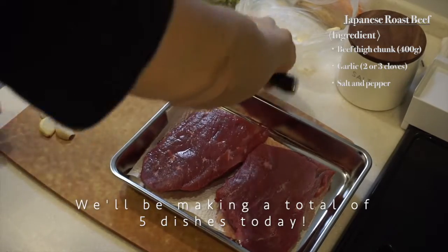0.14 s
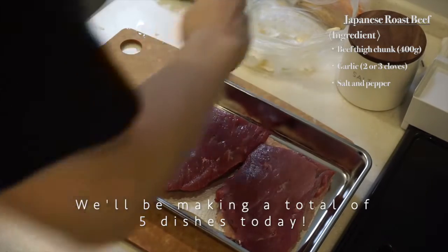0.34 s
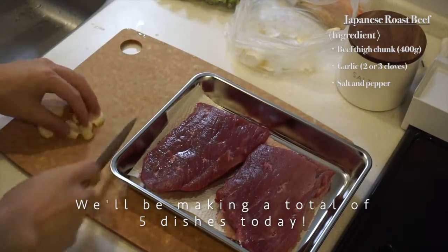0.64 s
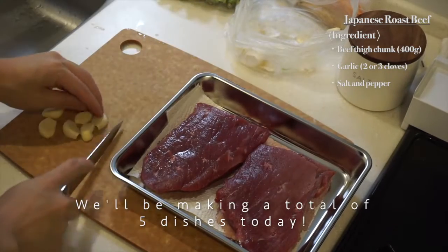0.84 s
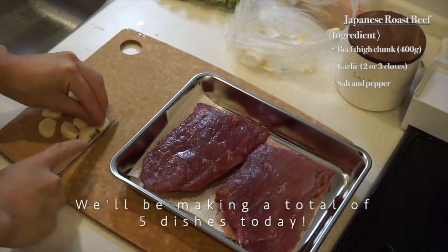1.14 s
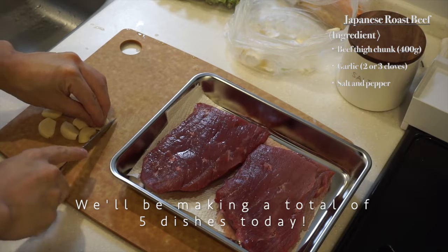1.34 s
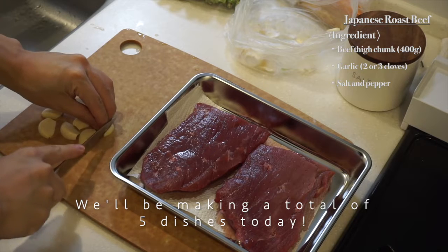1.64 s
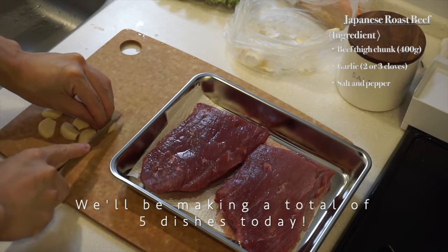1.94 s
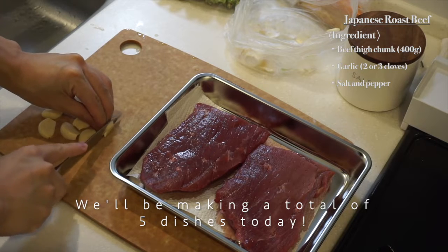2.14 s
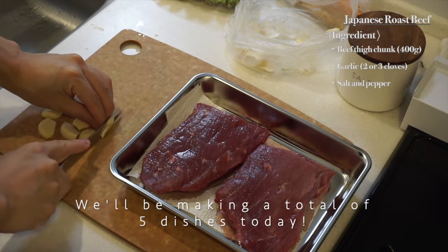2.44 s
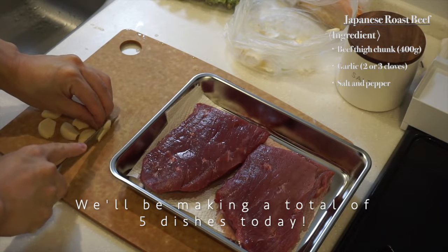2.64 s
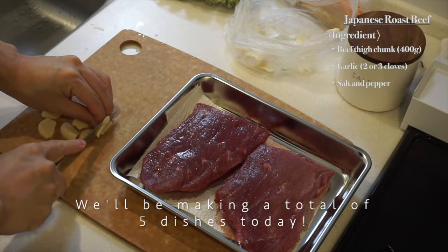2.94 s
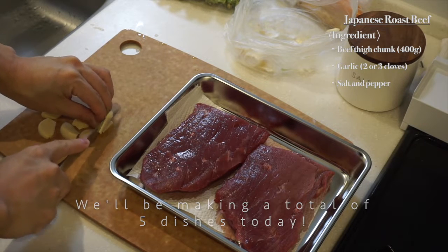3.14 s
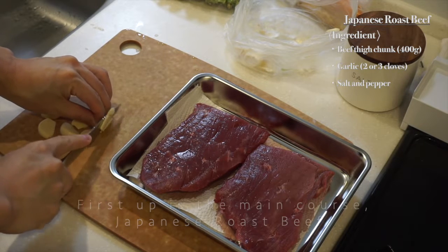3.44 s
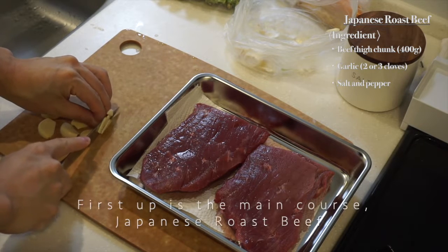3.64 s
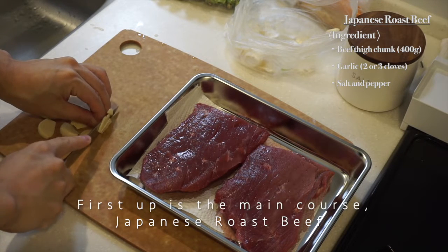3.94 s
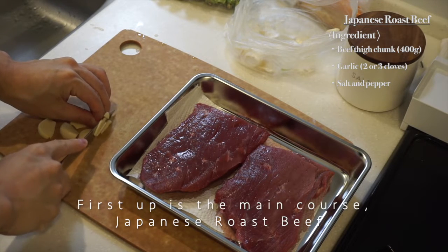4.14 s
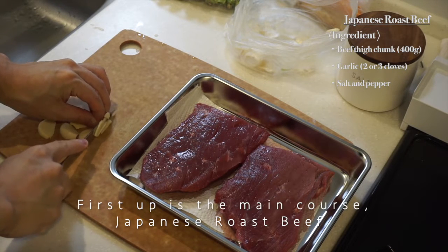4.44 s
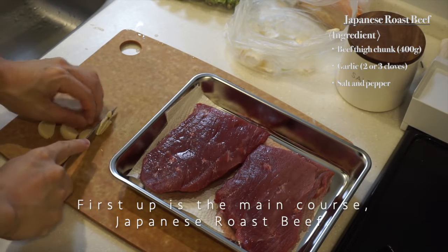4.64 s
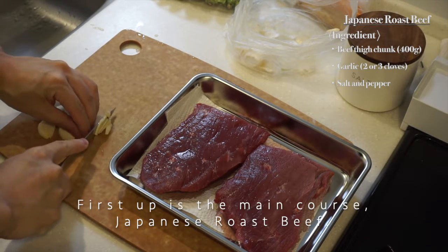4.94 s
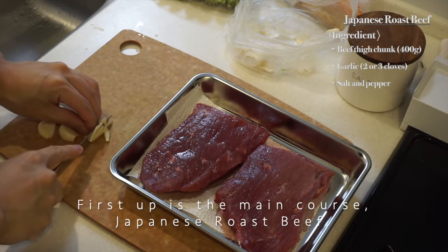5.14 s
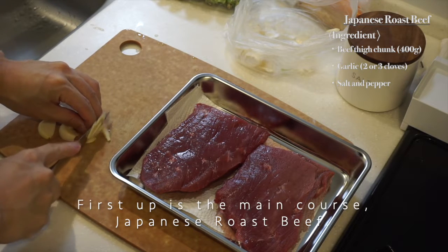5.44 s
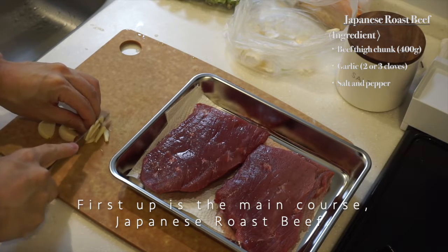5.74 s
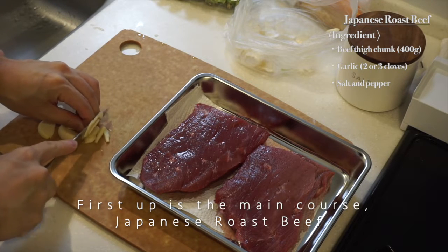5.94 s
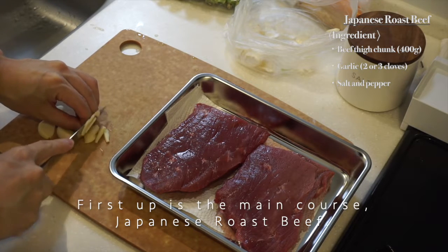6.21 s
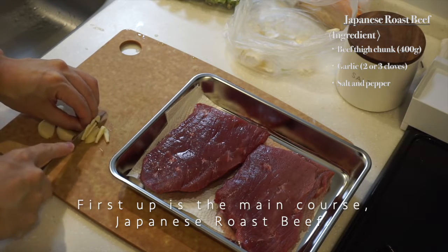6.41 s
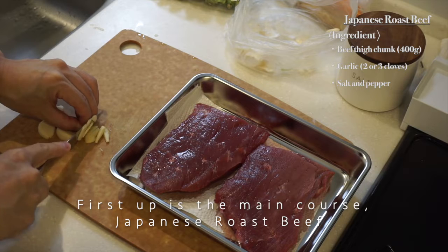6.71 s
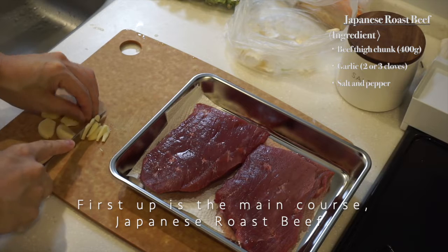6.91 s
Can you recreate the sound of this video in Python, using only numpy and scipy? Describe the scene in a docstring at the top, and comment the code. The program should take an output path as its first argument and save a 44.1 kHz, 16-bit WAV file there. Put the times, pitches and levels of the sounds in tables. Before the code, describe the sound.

A faint ventilation hum runs throughout in a small, slightly echoing kitchen, with the action heard from nearby. At the start a hand bumps hollowly on the counter, with a light clink of steel and a soft sleeve rustle. At 0.9 seconds a knife knocks on a hard cutting board, then scrapes across it with a short rasp at about 1.1 seconds. From 1.8 to 4.5 seconds it slices garlic at roughly three strokes a second. Each stroke is a small snap and a crisp crunch, mostly ending in a sharp knock, sometimes dull and dry, sometimes higher and lightly ringing. The counter thuds softly underneath. A short pause holds only a couple of faint ticks. Slicing resumes at 5.3 seconds, slightly quicker, with two brief squeaks of wet steel around 6.4 and 6.5 seconds and a last firm knock near 6.9 seconds.

```python
"""A steel knife slices garlic on a hard composite board in a small, live kitchen.
Each stroke snaps the skin of a clove, stalls, crunches through and mostly ends with the edge knocking
on the board: dull and dry if the blade stays pressed down, higher and ringing if it is left free.
First the knife is picked up, laid on the board and dragged across it; near the end the wet steel
squeaks. The counter thuds under the strokes, and faint ventilation hums throughout."""
import sys
import numpy as np
from scipy import signal
from scipy.fft import rfft, irfft, next_fast_len
from scipy.io import wavfile
from scipy.ndimage import map_coordinates

SR = 44100
rng = np.random.default_rng(int(sys.argv[2]) if len(sys.argv) > 2 else 0)


def materialize(psi):
    """Save the field psi as 16-bit PCM at rate SR to the path in sys.argv[1].

    A 1-D psi becomes a single channel; in a 2-D psi each row is a channel.
    """
    bounded = np.clip(np.atleast_2d(psi).T, -1, 1)
    quanta = np.round(bounded * 32767).astype(np.int16)
    wavfile.write(sys.argv[1], SR, quanta)


N = 311787
TIME = np.arange(N) / SR
HZ = np.fft.rfftfreq(16384, 1 / SR)  # frequency axis of the gain curves

# The edge lands on the board. Each row: start in seconds, knock in dB, freedom of the blade from
# 0 (pressed) to 1 (free), steel clack and edge click in dB over the knock.
LANDINGS = [(0.896, -17, 0.27, -3, -28), (1.839, -15, 0.3, -6.5, -28), (2.187, -17, 0.81, 0, -8),
            (2.492, -28, 0, -7, -10), (2.715, -17.5, 0.57, 1, -15.5), (3.057, -21.5, 0.64, -1.5, 1),
            (3.348, -15, 0.73, -1.5, -15.5), (3.926, -29.5, 0, -20, -19), (4.225, -16.5, 0.04, -5, -26),
            (4.466, -19, 0.96, 2, -8), (5.590, -18.5, 0.83, 0.5, -15), (6.105, -18.5, 1, 0.5, -6),
            (6.316, -34.5, 0.3, 5, -3), (6.359, -14, 0.03, -4.5, -20.5), (6.587, -18.5, 0.98, 2.5, -11),
            (6.844, -32.5, 0.7, 5, -10), (6.870, -13.5, 0.1, -1, -21)]
# Strokes through a clove. Each row: start, stall after the skin and length of the cut in seconds,
# then skin snap, crunch and counter thud in dB.
STROKES = [(1.784, 0.022, 0.037, -34.5, -37.5, -54), (2.136, 0.019, 0.038, -41, -37, -44.5),
           (2.450, 0.0054, 0.034, -53, -35.5, -54), (3.016, 0.0041, 0.033, -47, -34, -50),
           (3.306, 0.027, 0.011, -32, -27, -42), (3.575, 0.046, 0.028, -45, -35, -40.5),
           (3.882, 0.0023, 0.058, -41, -38.5, -40), (4.167, .032, 0.022, -31, -32, -41),
           (4.45, 0.0018, 0.0097, -43, -37.5, -49), (5.304, 0.023, 0.027, -39.5, -42.5, -73),
           (5.532, .030, 0.028, -28, -34.5, -42), (5.797, 0.026, 0.02, -36, -33.5, -42.5),
           (6.043, 0.02, .036, -31, -36, -42), (6.314, 0.014, 0.032, -34, -32, -53),
           (6.529, 0.017, 0.031, -29, -34, -50), (6.833, 0.0051, 0.082, -30, -38, -42)]
# The blade's modes. Each row: frequency in Hz, level in dB, free ringing time (t60) in seconds.
BLADE_MODES = [(2450, 2, .28), (3415, 2, .52), (4200, -9, .28), (5490, -12, .15), (6280, -12, .15),
               (7670, -9, .14), (10600, -14, .1), (12300, -11, .12), (15300, -11, .1)]


def amp(db):
    """Decibels to gain."""
    return 10 ** (np.asarray(db) / 20)


def unit(x):
    """Scale to rms 1."""
    return x / np.sqrt(np.mean(x ** 2) + 1e-20)


def along(points, hz=HZ):
    """Read (Hz, value) points on a log frequency axis."""
    freqs, values = np.transpose(points)
    return np.interp(np.log(hz + 1), np.log(freqs + 1), values)


def shape(spectrum, modes=()):
    """A gain curve of unit power from (Hz, dB) points and (Hz, width in Hz, dB) resonances."""
    peaks = sum(amp(db) ** 2 / (1 + (2 * (HZ - hz) / width) ** 2) for hz, width, db in modes)
    return unit(amp(along(spectrum)) * np.sqrt(1 + peaks))


def causal(gain):
    """The minimum-phase impulse response of a gain curve."""
    cepstrum = irfft(np.log(np.maximum(gain, 1e-6)))
    half = len(cepstrum) // 2
    cepstrum[1:half] *= 2
    cepstrum[half + 1:] = 0
    return irfft(np.exp(rfft(cepstrum)))


def colour(x, gain):
    """Pass a signal through a gain curve."""
    return signal.fftconvolve(x, causal(gain))[:len(x)]


def add(track, start, sound):
    """Mix a sound into a track at a start in seconds."""
    part = track[max(0, round(start * SR)):][:len(sound)]
    part += sound[:len(part)]


def grains(rate, spread_db):
    """Random impulses of uneven size, about rate a second, at rms 1."""
    chance, size = rng.random(N), rng.standard_normal(N)
    return unit((chance < rate / SR) * rng.choice([-1, 1], N) * amp(spread_db * np.clip(size, -2, 2)))


def wobble(rate):
    """A smooth random curve, rate knots a second."""
    return map_coordinates(rng.standard_normal(N // 20), [TIME * rate], mode="wrap")


def gesture(start, length, attack_s, release_s):
    """An envelope that swells 60 dB over the attack, holds from start, falls 60 dB over the release."""
    before, after = np.maximum(start - TIME, 0), np.maximum(TIME - start - length, 0)
    return amp(-60 * (before / attack_s + after / release_s))


def diffuse(pair):
    """Two unrelated noises become a diffuse stereo field, narrow in the bass and wide in the treble."""
    # Likeness of left and right. Each row: frequency in Hz, coherence from 0 to 1.
    coherence = [(30, .998), (70, .994), (150, .94), (330, .89), (650, .79), (1200, .68), (3000, .24),
                 (6500, 0), (12000, .15)]
    angle = np.arccos(np.clip(along(coherence), -.999, .999)) / 2
    mid, side = colour(pair[0], np.cos(angle)), colour(pair[1], np.sin(angle))
    return np.array([mid + side, mid - side])


def reverberation(build_s=0.00037):
    """A stereo room tail of unit energy a side; each frequency dies at its own speed."""
    # The room's decay. Each row: frequency in Hz, t60 in seconds.
    decay_times = [(100, 0.64), (500, 0.32), (1000, 0.4), (3000, 0.43), (6000, 0.5), (10000, 0.46),
                   (16000, 0.4)]
    # The tail's tone. Each row: frequency in Hz, level in dB.
    wall_tone = [(100, 9), (1000, 3.5), (3000, 5.5), (7000, -0.5), (15000, -9)]
    hz, t, noise = signal.stft(rng.standard_normal((2, SR * 3 // 4)), SR, nperseg=256)
    decay = amp(along(wall_tone, hz)[:, None] - 60 * t / along(decay_times, hz)[:, None])
    tail = diffuse(signal.istft(noise * decay, SR, nperseg=256)[1])
    tail *= 1 - np.exp(-(np.arange(tail.shape[1]) / SR / build_s) ** 2)
    return tail / np.sqrt(np.sum(tail ** 2) / 2)


def kitchen(x, direct_db, room_db):
    """Direct sound from straight ahead, close reflections off counter and wall, then the room."""
    response = amp(room_db) * reverberation()
    # Each row: left and right delay in seconds, left and right gain.
    paths = [(0, 0, 1, 1), (.0013, .00133, .25, .3), (.0027, .00272, .55, .65),
             (.0046, .0045, .4, .4), (.0059, .0061, .3, .65), (.0119, .0121, .33, .33)]
    for left_s, right_s, left, right in paths:
        add(response[0], left_s, amp([direct_db]) * left)
        add(response[1], right_s, amp([direct_db]) * right)
    return signal.fftconvolve(x[None], response, axes=1)[:, :len(x)]


def resonant(spectrum, resonance_db=0):
    """The gain curve of a spectrum with the steady, narrow resonances of board and room."""
    # Each row: frequency in Hz, width in Hz, peak in dB against the broad response.
    resonances = [(379, 16, 10), (431, 16, 4), (566, 18, 5), (662, 24, 8), (808, 32, 3), (898, 22, 4),
                  (982, 30, 4), (1035, 18, 4), (1076, 18, 5), (1120, 20, 0), (1172, 16, 3), (1267, 22, 0),
                  (1382, 30, 4), (1489, 18, 6), (1545, 18, 1), (2240, 36, 3), (2603, 28, 6), (2767, 34, 1),
                  (2927, 30, 2), (2970, 30, 1), (3244, 24, 0), (3405, 50, 1)]
    return shape(spectrum, [(hz, width, db + resonance_db) for hz, width, db in resonances])


def room_tone(floor_db=-53, hum_db=-2):
    """Ventilation noise with a few slightly unsteady hum lines."""
    # The air's spectrum and the hum lines. Each row: frequency in Hz, relative level in dB.
    air_tone = [(12, -42), (20, -7), (70, -11), (107, -4.5), (193, -18), (228, -5.5), (255, -12),
                (410, -8.5), (459, -17.5), (678, -17.5), (4420, -29), (5380, -27.5), (6010, -29.5),
                (9670, -28.5), (16000, -31)]
    hum_lines = [(59.2, -65), (226, -71), (258, -65), (377, -62.5)]
    air = diffuse([colour(rng.standard_normal(N), shape(air_tone)) for _ in range(2)])
    hum = sum(amp(db) * np.sin(2 * np.pi * hz * TIME + wobble(3)) for hz, db in hum_lines)
    return amp(floor_db) * air + amp(hum_db) * hum


def handling():
    """A hand bumps hollowly over the counter and its sleeve brushes along."""
    # Each row: start and length in seconds, bumps and rustle in dB.
    moves = [(0, 0.015, -33.5, -43.5), (0.082, .01, -47, -57), (.47, .02, -60, -58),
             (0.583, 0.14, -77, -50.5), (1.52, 0.018, -63, -61), (1.611, 0.014, -65, -78)]
    # The bumps' spectrum. Each row: frequency in Hz, level in dB.
    bump_tone = [(30, -8), (140, -3.5), (300, -11.5), (850, -6), (1400, -8), (2000, -4.5), (3500, -15.5),
                 (8000, -28), (16000, -41)]
    bumping = sum(amp(db) * gesture(start, length, 0.16, 0.09) for start, length, db, _ in moves)
    rustling = sum(amp(db) * gesture(start, length, 0.25, 0.29) for start, length, _, db in moves)
    hollow = shape(bump_tone, [(146, 56, 3.2), (594, 68, 1.8), (883, 77, 6.6), (2010, 95, 6.4)])
    sleeve = shape([(300, 1), (2500, -0.5), (5000, -0.5), (11000, 0.5), (16000, -4.0)])
    bumps = colour(bumping * grains(rate=1500, spread_db=5), hollow)
    rustle = colour(rustling * rng.standard_normal(N), sleeve)
    return kitchen(bumps + rustle, direct_db=-4.5, room_db=-4.5)


def ticks(tick_db=4, tick_t60=0.025, ring_db=-4):
    """Light clinks of steel, cut short by hand or board, and at 4.59 s a faint, thin, dry tick."""
    # Each row: start in seconds, level in dB, share of the free ringing time.
    events = [(0.135, -45, 0.77), (.661, -48.5, 0.063), (.897, -51, .4), (1.529, -59, 0.25),
              (2.639, -62, 0.046), (4.59, -47, .03), (4.93, -59.5, 0.038)]
    noise, ring, t = np.zeros(N), np.zeros(N), np.arange(SR // 2) / SR
    for start, level_db, share in events:
        add(noise, start, amp(level_db + tick_db - 60 * t / tick_t60) * rng.standard_normal(len(t)))
        for hz, db, t60 in BLADE_MODES:
            decay = amp(level_db + ring_db + db - 60 * t / (t60 * share))
            add(ring, start, decay * np.sin(2 * np.pi * hz * t))
    tone = shape([(300, -11), (1500, 1), (2600, -1.5), (5000, -6.5), (12000, 0.5), (16000, -8)])
    return ring + kitchen(colour(noise, tone) + amp(-15.5) * ring, direct_db=4.5, room_db=12.5)


def squeaks(sag_hz_per_s=700, waver=0.018, flutter_db=2.0):
    """Wet steel rubs on the board; the unsteady pitch sags as the blade slows."""
    # Each row: start and length in seconds, starting pitch in Hz, level in dB.
    rubs = [(6.396, 0.11, 1303, -31), (6.532, 0.045, 985, -29)]
    sound = np.zeros(N)
    for start, length, hz, db in rubs:
        pitch = hz - sag_hz_per_s * np.clip(TIME - start, 0, length)
        phase = 2 * np.pi * np.cumsum(pitch * (1 + waver * wobble(250))) / SR
        level = amp(db + flutter_db * wobble(110)) * gesture(start, length, 0.055, 0.06)
        sound += level * (np.sin(phase) + amp(-26) * np.sin(2 * phase))
    return kitchen(sound, direct_db=-3.5, room_db=-11.0)


def drag(loss=0.032, sing_db=24, flutter_db=4):
    """The edge sticks and slips over the board and sets the hand-damped blade singing."""
    # Each row: start and length in seconds, rasp and singing in dB.
    pushes = [(0.997, 0.059, -40, -43), (1.122, 0.026, -18.5, -48.5), (1.209, .005, -55, -43)]
    # The rasp's spectrum. Each row: frequency in Hz, level in dB.
    rasp_tone = [(30, -26), (90, -28), (160, -9), (280, -11.5), (700, 5), (1050, 10.5), (1450, 7),
                 (1900, 1), (2600, 1.5), (3600, -3), (4600, -15.5), (8000, -26.5), (16000, -53)]
    rubbing = sum(amp(db) * gesture(start, length, 0.11, 0.047) for start, length, db, _ in pushes)
    singing = sum(amp(db) * gesture(start, length, 0.31, 0.075) for start, length, _, db in pushes)
    slips = grains(rate=3000, spread_db=4)
    rasp = colour(rubbing * slips, resonant(rasp_tone, resonance_db=-4))
    damped_modes = [(hz, hz * loss, db + sing_db) for hz, db, _ in BLADE_MODES]
    steel = shape([(1500, -47), (2500, -18), (4000, -1), (7500, 8), (11000, 5), (16000, 0)], damped_modes)
    flutter = amp(flutter_db * wobble(69.4) - 4.5)
    song = colour(singing * flutter * rng.standard_normal(N), steel)
    return kitchen(rasp + song, direct_db=-1.5, room_db=-5.5)


def thuds(t60=0.56, rise_s=0.0016, landing_db=-30):
    """The weight behind a stroke shakes the counter as it meets the clove and as the edge lands."""
    power, t = np.zeros(N), np.arange(SR // 2) / SR
    pushes = [(start, db) for start, *_, db in STROKES]
    pushes += [(start, db + landing_db) for start, db, *_ in LANDINGS]
    for start, db in pushes:
        envelope = amp(db - 60 * t / t60) * (1 - np.exp(-t / rise_s))
        add(power, start, envelope ** 2)
    counter = shape([(20, -3), (40, -14), (54, 10), (64, -2), (78, 7.5), (100, -10.5), (150, -5.0),
                     (220, -20.5), (500, -29), (2000, -73)])
    return np.sqrt(power) * colour(rng.standard_normal(N), counter)


def garlic(release_s=0.0043, snap_s=0.0036, clump_db=3):
    """The skin snaps, the edge stalls, then the clove gives and cells burst in clumps of crackle."""
    # Spectra of the flesh and the skin. Each row: frequency in Hz, level in dB.
    flesh_tone = [(100, -14), (400, -5), (1050, 3), (1800, -3), (2800, -1), (4500, -5), (6500, -2),
                  (8500, -2), (11000, .5), (14500, -1.5), (16000, -5)]
    skin_tone = [(100, -20), (400, 1.5), (1050, 7.5), (1800, 10), (2800, 3), (4500, 1.5), (6500, 4),
                 (8500, -3.5), (11000, 0.5), (16000, -8.5)]
    stall_db, sink_db, give_db = -16.5, 3, 4  # against the crunch: stall, growth over the cut, 2nd snap
    crackle, snaps, t = np.zeros(N), np.zeros(N), np.arange(SR // 6) / SR
    for start, stall, length, snap_db, crunch_db, _ in STROKES:
        depth = np.clip((t - stall) / length, 0, 1)
        effort = amp(crunch_db + np.where(t < stall, stall_db, sink_db * (depth - .5)))
        add(crackle, start, effort * np.exp(-np.maximum(t - stall - length, 0) / release_s))
        add(snaps, start, amp(snap_db) * np.exp(-t / snap_s))
        add(snaps, start + stall, amp(crunch_db + give_db) * np.exp(-t / snap_s))
    cells = grains(rate=2500, spread_db=5.5) * unit(amp(clump_db * wobble(170)))
    fibres = grains(rate=6000, spread_db=2.5)
    burst = colour(crackle * cells, resonant(flesh_tone)) + colour(snaps * fibres, resonant(skin_tone))
    return kitchen(burst, direct_db=-6.0, room_db=-2.5)


def bending_waves(build_s=0.001):
    """A push spreads through the board: a burst of a few ms with a flat spectrum and unit energy."""
    t = np.arange(1024) / SR
    waves = rfft(rng.standard_normal(len(t)) * t * np.exp(-t / build_s))
    burst = irfft(waves / np.abs(waves))[:len(t) // 2]
    return burst / np.linalg.norm(burst)


def after_ring(tone, t60=0.57, beat_db=1.0):
    """The blade's dense modes beat and die away after a blow; the highest take little part."""
    t = np.arange(SR) / SR
    ring = rng.standard_normal(SR) * amp(beat_db * wobble(98.0)[:SR] - 60 * t / t60)
    tilt = amp(along([(500, 0.5), (1100, -6), (3000, -3.5), (6000, -5), (10000, -9)]))
    return colour(ring / np.linalg.norm(ring), tone * tilt)


def chops(level_db=23, tick_slope=2.33):
    """The edge strikes the board in one sharp push; a free blade rings on, a pressed one stops short."""
    # Spectra of board knock, steel clack, edge click and top tick. Each row: frequency in Hz, level in dB.
    knock_tone = [(40, -30), (250, -30.5), (480, -13.5), (640, -13), (800, -3.5), (1020, 0), (1400, -3.5),
                  (1750, -11), (2300, -103), (5000, -48)]
    clack_tone = [(1000, -31), (1800, -7.5), (2300, 2), (2700, 2.5), (3350, 2.5), (4000, -1), (4600, -9.5),
                  (6000, -11), (12000, -73)]
    click_tone = [(2500, -67), (4900, -4.5), (5900, 6), (7200, 3.5), (8700, -1.5), (12000, -42)]
    tick_tone = [(5000, -31), (9000, -3), (10300, 4), (12300, -1), (13200, 0), (16000, -25)]
    # Pressing down lowers the pitch ratio and damps both the after-ring and the resonances.
    free_pitch, pressed_pitch, pressed_ring_db, pressed_resonance_db = 1.05, 0.86, -19, -1
    out = np.zeros((2, N))
    for start, knock_db, free, clack_db, click_db in LANDINGS:
        pressed = 1 - free
        pitch = free * free_pitch + pressed * pressed_pitch
        knock = [(hz * pitch ** .5, db) for hz, db in knock_tone]
        clack = [(hz * pitch, db) for hz, db in clack_tone]
        layers = np.array([resonant(spectrum, pressed * pressed_resonance_db)
                           for spectrum in (knock, clack, click_tone, tick_tone)])
        # Garlic under the edge cushions the click, and the top tick even more.
        gains = amp([0, clack_db, click_db, tick_slope * click_db])
        tone = amp(knock_db) * np.sqrt(gains ** 2 @ layers ** 2)
        sound = amp(pressed * pressed_ring_db) * after_ring(tone)
        add(sound, 0, signal.fftconvolve(causal(tone), bending_waves()))
        # A free blade radiates more into the room.
        left, right = kitchen(amp(level_db) * sound, direct_db=4.4 * pressed - 8.5, room_db=-5.5 * pressed)
        add(out[0], start, left)
        add(out[1], start, right)
    return out


def scene():
    """Knife, garlic and hand lean a little to the right, over the counter's thuds and the room tone."""
    # Each row: frequency in Hz, left minus right in dB.
    balance = [(60, -.1), (300, -.7), (600, -2.2), (1200, -.6), (2800, -1), (5000, 0), (12000, .3)]
    left, right = chops() + garlic() + drag() + squeaks() + handling() + ticks()
    lean = amp(along(balance) / 2)
    return np.array([colour(left, lean), colour(right, 1 / lean)]) + thuds() + room_tone()


def record(dry, top_hz=16200):
    """A brick-wall low-pass takes off the very top of the treble."""
    size = next_fast_len(N + SR // 4)
    passband = np.fft.rfftfreq(size, 1 / SR) < top_hz
    return irfft(rfft(dry, size) * passband, size)[:, :N]


dry = scene()
out = record(dry)
materialize(out)
```